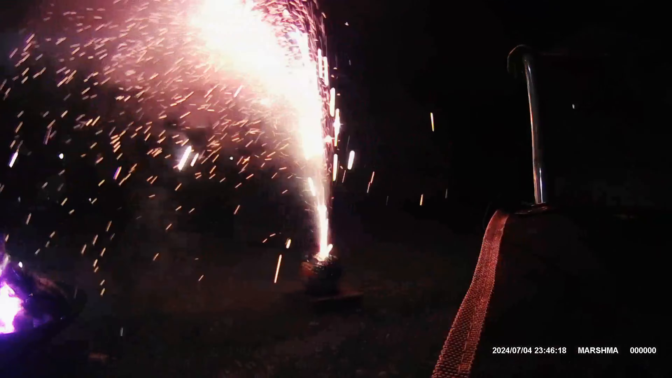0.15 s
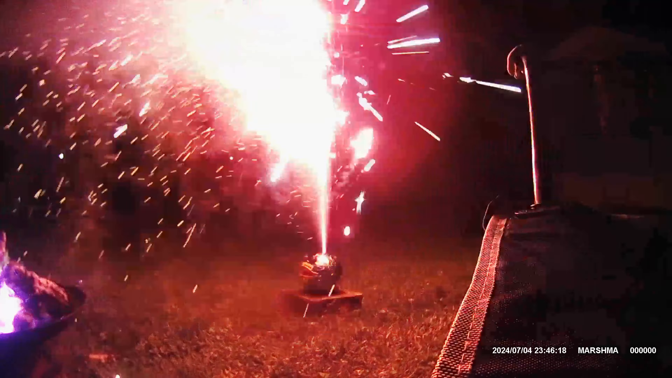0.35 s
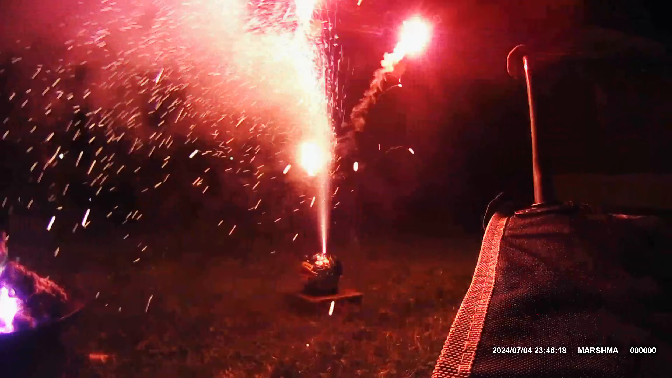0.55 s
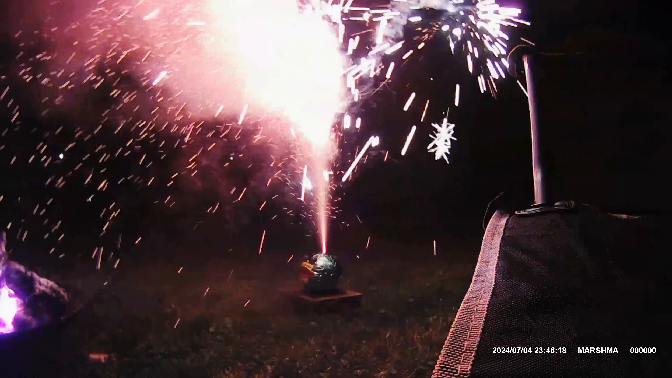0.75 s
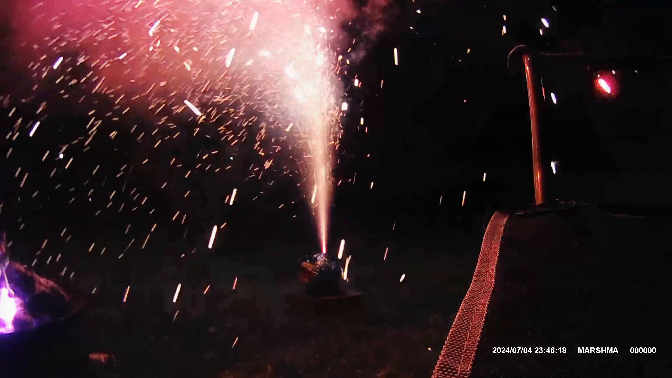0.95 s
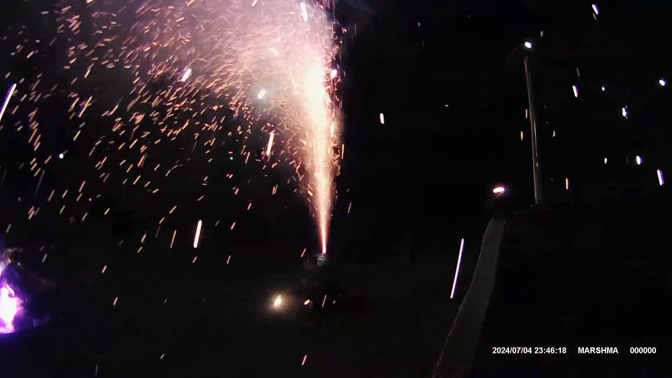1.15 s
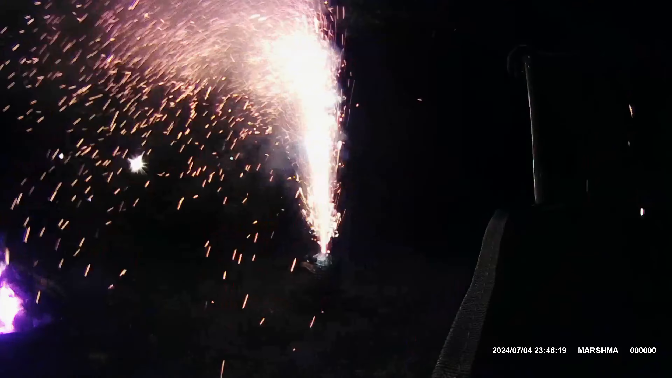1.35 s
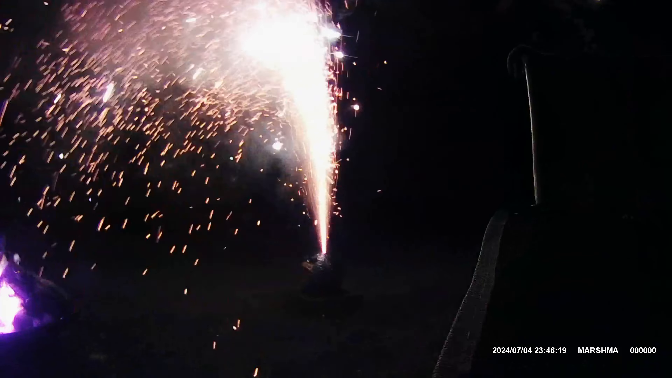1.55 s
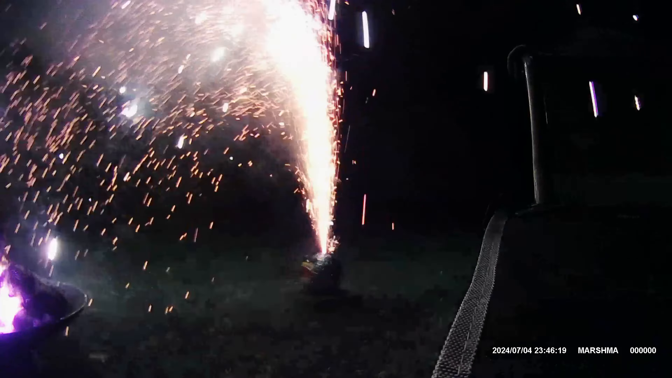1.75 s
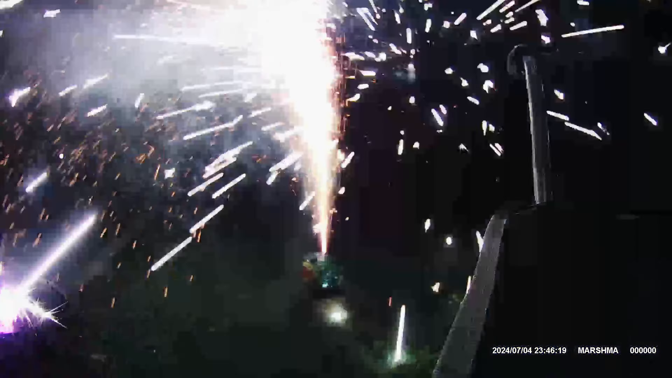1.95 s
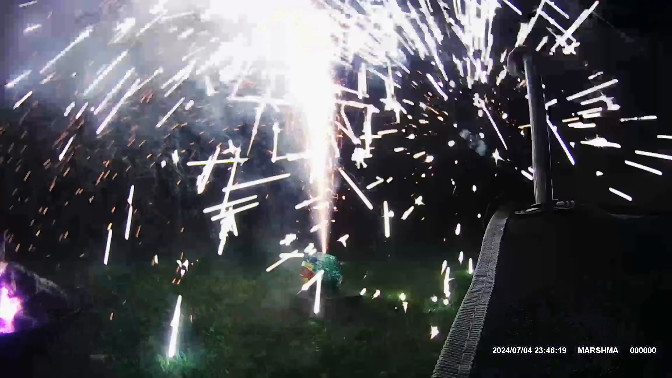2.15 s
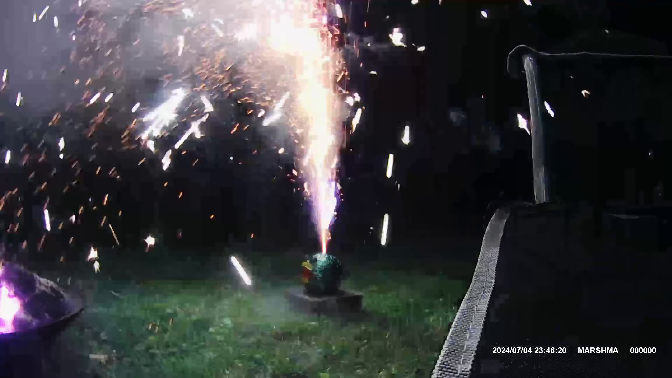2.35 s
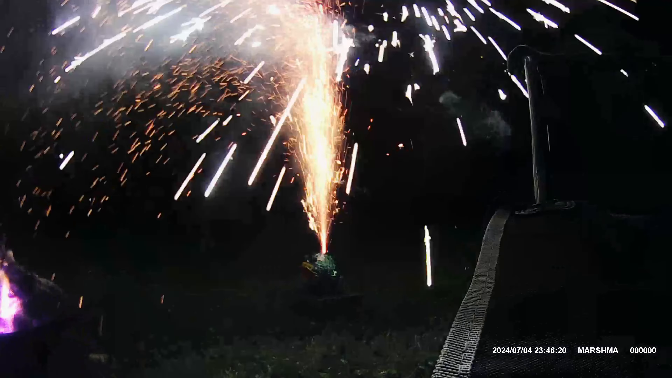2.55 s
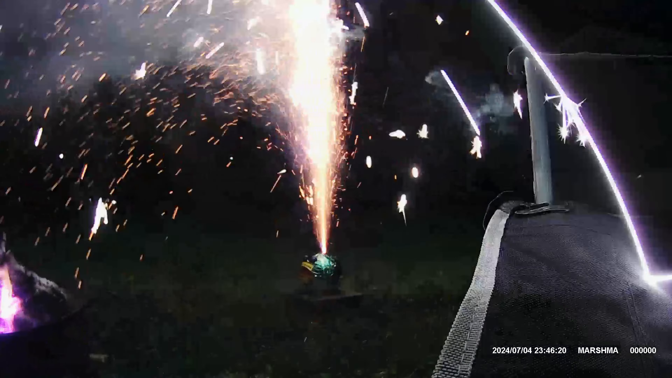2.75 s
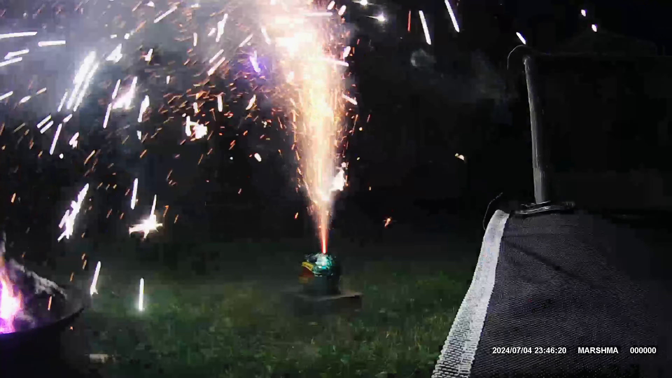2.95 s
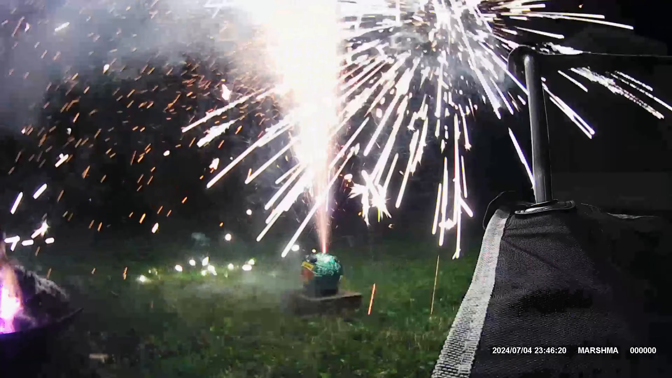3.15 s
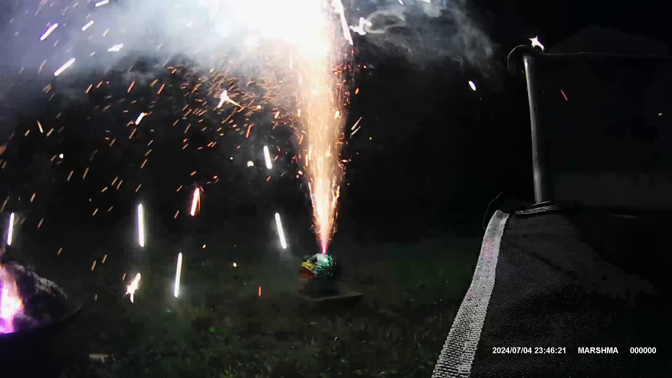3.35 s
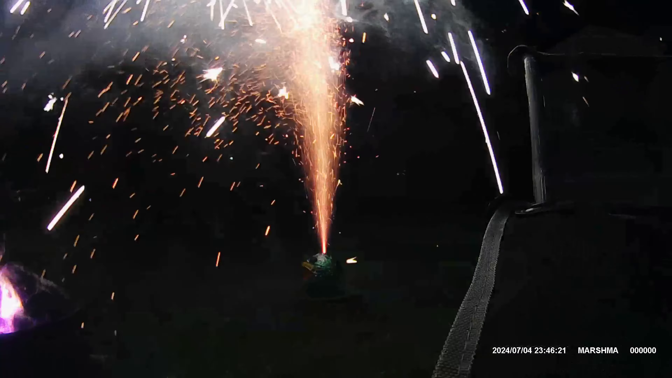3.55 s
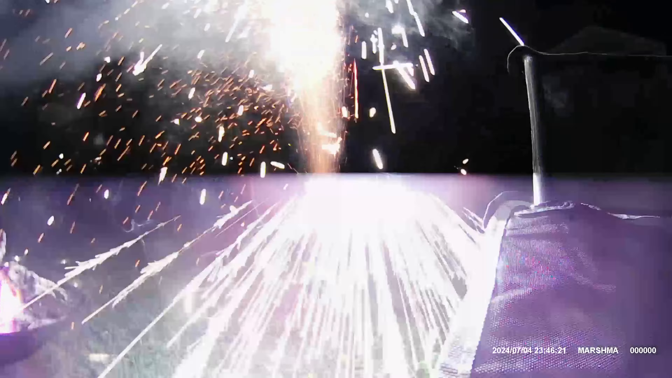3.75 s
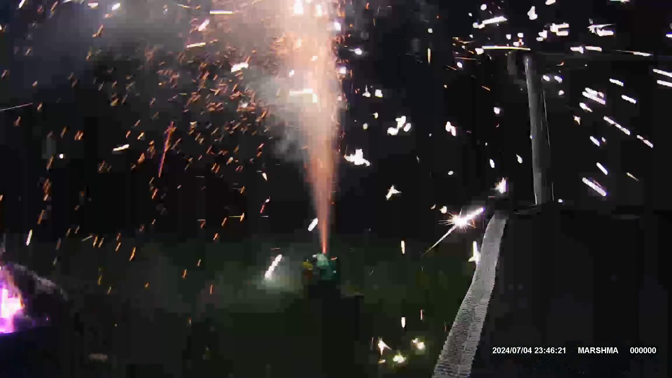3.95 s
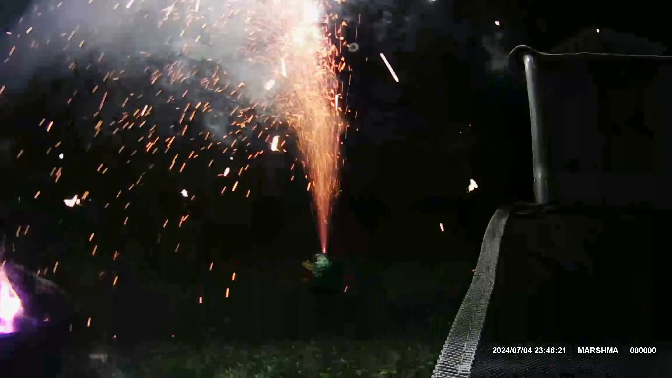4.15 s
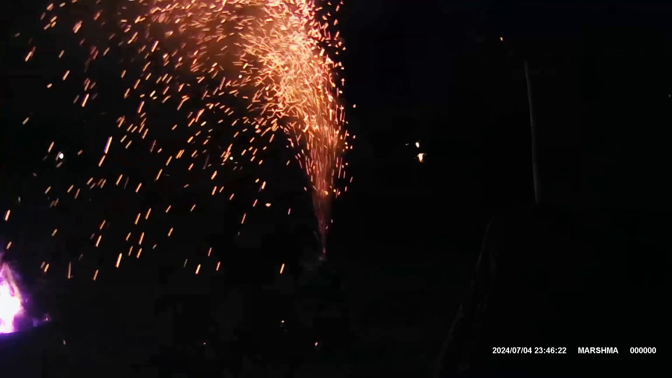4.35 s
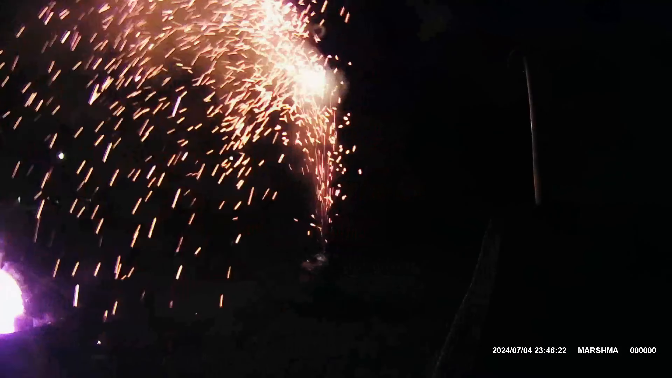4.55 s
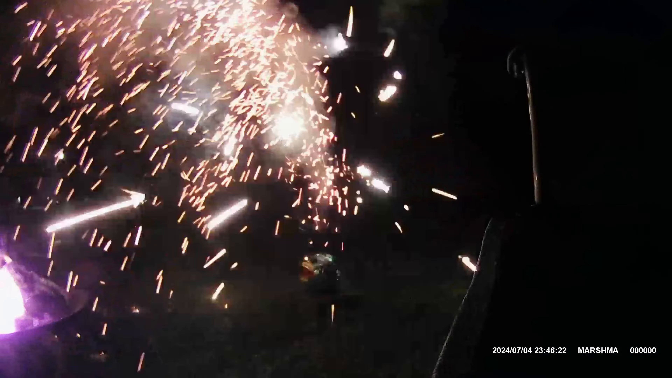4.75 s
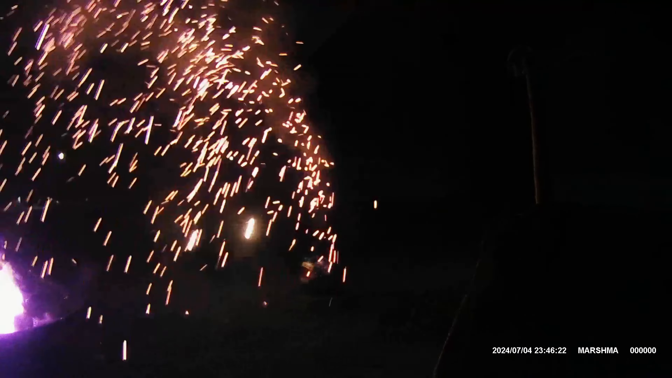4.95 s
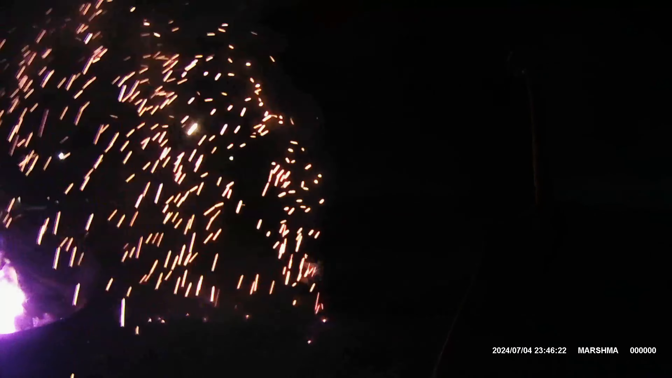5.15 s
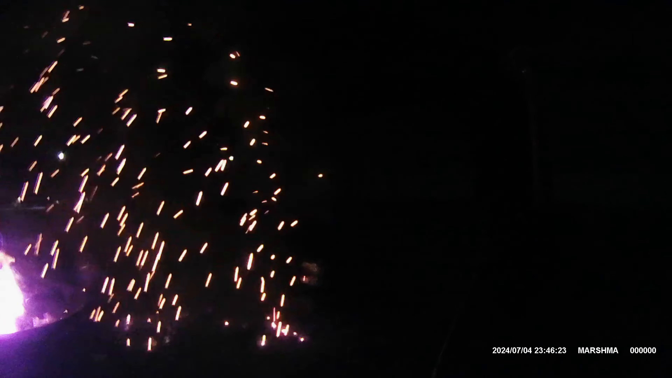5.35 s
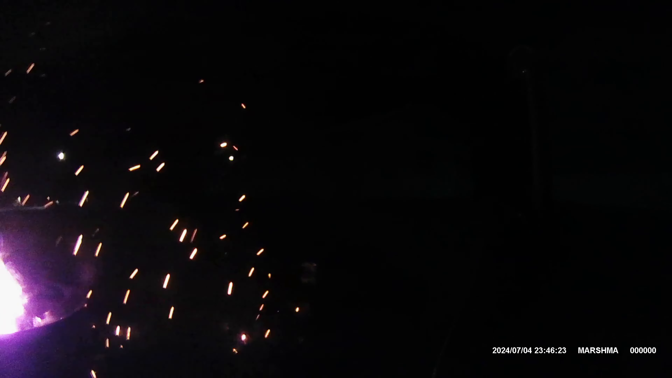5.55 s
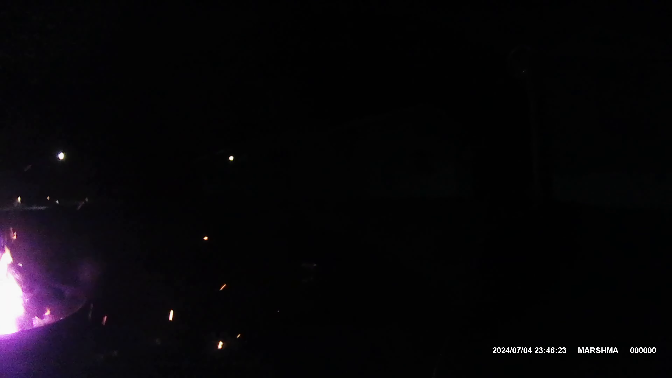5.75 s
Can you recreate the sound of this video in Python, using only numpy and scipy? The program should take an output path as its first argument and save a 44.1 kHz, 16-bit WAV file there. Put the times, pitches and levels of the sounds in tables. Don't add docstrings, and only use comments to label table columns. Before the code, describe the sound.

A ground fountain firework hisses and snaps outdoors, thickens into a violent overloaded crackling barrage, then stops abruptly into faint sizzle and quiet night.

```python
import sys
import numpy as np
from scipy import signal
from scipy.fft import rfft, irfft
from scipy.io import wavfile

SR = 44100
rng = np.random.default_rng(int(sys.argv[2]) if len(sys.argv) > 2 else 0)


def log_audio(samples):
    frames = np.atleast_2d(samples).T
    limited = np.clip(frames, -1, 1)
    pcm = np.round(limited * 32767).astype(np.int16)
    wavfile.write(sys.argv[1], SR, pcm)


def volts(x):
    e = np.asarray(x, float) / 20
    return 10 ** e


N = 260190


def rms_one(x):
    return x / np.sqrt(np.mean(x ** 2) + 1e-20)


def noise():
    return rng.standard_normal(N)


def in_time(rows):
    s, *columns = np.transpose(rows)
    return [np.interp(np.arange(N) / SR, s, c) for c in columns]


def passed(x, order, hz, kind="low"):
    return signal.sosfilt(signal.butter(order, hz, kind, fs=SR, output="sos"), x)


def impulses(times_s, gains):
    clicks = np.zeros(N)
    clicks[np.round(np.asarray(times_s) * SR).astype(int)] = gains
    return clicks


def colour(x, spectrum):
    hz, db = np.transpose(spectrum)
    grid = np.maximum(np.arange(2049) * SR / 4096, 1)
    cepstrum = irfft(np.log(volts(np.interp(np.log(grid), np.log(hz), db))))
    cepstrum[1:2048] *= 2
    cepstrum[2049:] = 0
    response = irfft(np.exp(rfft(cepstrum)))
    response = response / np.sqrt(np.sum(response ** 2))
    return signal.fftconvolve(x, response)[:len(x)]


def drift(rate_hz):
    r = np.exp(-2 * np.pi * rate_hz / SR)
    slow = signal.lfilter([1], [1, -2 * r, r * r], rng.standard_normal(N + SR))[SR:]
    return rms_one(slow)


def damped_cycle(clicks, hz, turns):
    r = volts(-60 * hz / (turns * SR))
    w = 2 * np.pi * hz / SR
    return signal.lfilter([0, np.sin(w)], [1, -2 * r * np.cos(w), r * r], clicks + 1e-18)


# (time [s], level [dB], burst length [ms], low punch [dB])
FIRST_CRACKS = [(0.076, -33, 9.9, -31.5), (0.1113, -27, 1.4, -33.5), (0.1741, -12.5, 0.8, -6.5),
                (0.2066, -3.5, 2.7, -31.5), (0.2196, -16, 0.92, -48), (0.2495, -6, 0.22, -39),
                (0.2567, -21.5, 6.9, -50), (0.2932, -12.5, 3.3, -47), (0.318, -39, 3, -50),
                (0.3704, -6.5, 3.5, -33), (0.3938, -6, 0.34, -55), (0.4496, -21.5, 3.3, -55),
                (0.5769, -12, 0.86, -32), (0.5856, -13.5, 4, -42), (0.7084, -19.5, 2.4, -32),
                (0.7193, -19.5, 0.76, -51), (0.739, -34.5, 1.7, -56), (0.7736, -4, 1.9, -0.5),
                (0.7933, -4.5, 3, -30), (0.9215, -13, 2.9, -44), (0.9855, -16.5, 3, -20),
                (1.0119, -11.5, 1, -53), (1.0666, -15.5, 2.5, -35.5), (1.198, -27.5, 0.85, -58),
                (1.2595, -22.5, 2, -37), (1.2696, -23.5, 2.9, -38), (0.9886, -5.5, 1.4, -37),
                (1.4039, -16, 3.7, -30), (1.4938, -29.5, 0.87, -52), (1.6112, -4, 3.9, 5),
                (1.7113, -3.5, 5, -24.5)]
# (time [s], level [dB], burst length [ms])
VOLLEYS = [(1.7922, 0, 2.8), (1.815, -15.5, 9.1), (1.8244, -1, 10), (1.832, -3.5, 6.5),
           (1.8998, -1.5, 14), (1.9365, -1, 4.5), (1.9726, 1.5, 2.3), (2.0166, -11, 1.2),
           (2.027, -3.5, 1.44), (2.0909, 0, 2.9), (2.1251, 0.5, 1.8), (2.131, -6, 5.7),
           (2.1373, -7.5, 3.5), (2.1447, -2, 2.4), (2.182, -8, 5.5), (2.2005, -24, 0.8),
           (2.2188, -19, 1.2), (2.2416, -2, 5.6), (2.2612, -2, 2.6), (2.3038, -10.5, 3.3),
           (2.31, -6, 12), (2.3192, -5.5, 6.1), (2.3357, -2, 3.2), (2.3892, -9, 13.5), (2.4018, -2, 1.9),
           (2.4234, -17, 1.6), (2.4386, -19, 2.7), (2.4413, -13, 4), (2.4591, -4, 7), (2.5026, -13, 4.3),
           (2.5067, -3.5, 9.6), (2.6052, -12.5, 6.5),
           (2.668, -3, 7.7), (2.706, -1.5, 4.3), (2.719, 1, 2.2), (2.725, 1.5, 2.7), (2.7344, -1.5, 2.4),
              (2.775, -1, 4.8), (2.804, 1, 5.7), (2.8146, -7.5, 4.7), (2.822, -2.5, 6.6), (2.8407, -2, 2),
              (2.8656, -20, 4.2), (2.8714, -6.5, 6), (2.887, -1.5, 8.0), (2.898, -1, 5.1),
              (2.9202, -6.5, 8.2), (2.967, -21, 0.72), (2.9785, -2, 0.55), (2.991, -12, 2),
              (2.997, -6, 9.3), (3.012, 4.5, 3.1), (3.021, -0.5, 1.8), (3.079, -0.5, 5.8), (3.0888, 0, 3.4),
              (3.1216, -16.5, 0.9), (3.1267, 0, 7.6), (3.153, -2.5, 4.8), (3.1661, -2, 12),
              (3.188, -12, 2.5), (3.196, -12, 6.6), (3.214, -11.5, 1.1),
           (3.247, -8, 12), (3.252, 0, 4.7), (3.2756, -5, 8.3), (3.306, 0, 3.1), (3.333, 0.5, 2.8),
                (3.354, -13.5, 2.2), (3.359, 0, 3.7), (3.369, -0.5, 5), (3.3865, 0, 4.6), (3.406, -9, 2.6),
                (3.4095, -0.5, 2), (3.433, -2, 21), (3.443, -9, 10), (3.454, -1.5, 3.5), (3.4683, -12, 1.5),
                (3.479, -15.5, 1.3), (3.49, -2, 13.5), (3.5, 2.5, 3.4), (3.514, -2, 10.3), (3.546, -6, 8.4),
                (3.61, -5, 8.7), (3.623, -15, 0.92), (3.625, -11, 1.6), (3.6556, -14.5, 0.74),
                (3.6598, -3, 3.3), (3.6692, 2, 2.7), (3.679, -7.5, 4.5),
           (3.7205, -13.5, 1.1), (3.7257, -6.5, 4.4), (3.736, 0.5, 6.5), (3.7626, -1.5, 4),
               (3.7838, -3, 3.3), (3.7921, -5, 1.4), (3.813, -12.5, 5.2), (3.823, -2, 6.4),
               (3.8476, -13.5, 1.3), (3.8667, -1.5, 15.5), (3.879, -9, 2.5), (3.903, 0.5, 4.2),
               (3.9333, 4.5, 3), (3.951, -3, 2.6), (3.9683, -4, 4.2), (3.98, -3.5, 7.6), (3.994, -5.5, 8.6),
               (4.05, -3, 5.2), (4.0664, -5.5, 7.9), (4.0727, -7.5, 3.3), (4.0865, -7, 5.8),
               (4.1024, -8.5, 8.3), (4.1654, 1.5, 6.4), (4.2084, -5, 6), (4.2112, -1, 4.9),
               (4.7113, -12, 1.9)]


def bursting_stars():
    volleys = VOLLEYS
    return FIRST_CRACKS + [(s, db, ms, -13.5 + 2.5 * db) for s, db, ms in volleys]


# (time [s], level [dB])
BOOMS = [(2.027, -10.5), (2.1323, -9.5), (2.31, -5.5), (2.4017, -5.5), (2.668, -14), (2.7046, -10.5),
         (3.1538, -5.5), (3.2479, -12.5), (3.443, -9), (3.6113, -7.5), (3.681, -12), (3.7273, -9),
         (3.933, 0), (4.053, -10.5), (4.067, 4.5), (4.0872, -10.5), (4.1039, -14.5), (4.2083, -20),
         (4.7125, -57)]
# (frequency [Hz], density [dB per Hz])
CRACK_COLOUR = [(35, -19), (60, -11.5), (408, -0.5), (898, -1.5), (983, 0), (1230, -1), (2160, 1),
                (3100, -1.5), (7150, 1.5), (11500, -3), (13100, -16.5)]


def cracks(spread_db, fade_ms, fade_share, droop_db, linger_ms, linger_db, linger_lags, overload_db, knee_db):
    envelope, punches, fronts = np.zeros((3, N))
    after_ms = np.arange(SR // 12) * 1000 / SR
    for s, db, length_ms, punch_db in bursting_stars():
        at = round(s * SR)
        drive_db = db + overload_db * np.clip((db - knee_db) / -knee_db, 0, 1)
        late = np.maximum(after_ms - length_ms, 0)
        fade = fade_ms + fade_share * min(length_ms, 5)
        shape = volts(droop_db * np.minimum(after_ms / length_ms, 1)) * np.exp(-late / fade)
        shape = shape + volts(linger_db - linger_lags * (drive_db - db)) * np.exp(-late / linger_ms)
        span = slice(at, at + len(shape))
        envelope[span] = np.hypot(envelope[span], volts(drive_db) * shape[:N - at])
        punches[at] = volts(punch_db + 12.5)
        front_db = drive_db + 2.5 + 6 * np.clip(db / knee_db, 0, 1)
        fronts[at] = volts(min(front_db, -1))
    for s, punch_db in BOOMS:
        punches[round(s * SR)] += volts(punch_db + 22)
    sizes = volts(spread_db * np.minimum(rng.exponential(1, N), 5)) * rng.choice([-1, 1], N)
    swarm = envelope * rms_one(sizes) * volts(1.2 * drift(450))
    bright = lone_treble(colour(swarm, CRACK_COLOUR) + shock(fronts))
    return bass_tint(tint(bright) + punch(punches))


def shock(clicks):
    clicks = clicks + volts(-22.5) * np.roll(clicks, round(0.0009 * SR))
    return damped_cycle(clicks, hz=8600, turns=4.5) + volts(-4) * damped_cycle(clicks, hz=4900, turns=3.5)


def punch(clicks):
    clicks = clicks + volts(-24.0) * np.roll(clicks, round(.0024 * SR))
    edge = volts(-4) * damped_cycle(clicks, hz=1650, turns=4.0)
    body = damped_cycle(clicks, hz=670.0, turns=2.6) + edge
    return passed(body, 1, 110, "high")


# (time [s], body [dB], treble [dB])
TINTS = [(.174, 8, -9), (.207, -0.5, -3.5), (.293, 1, 0), (.393, -12, 6), (.793, -3.5, 0), (.921, 0.5, 2),
         (.985, 4.5, 0), (1.403, 0, 7), (1.611, 8, -11), (1.711, 2, -1.5), (2.182, -3, 2.5),
         (2.39, -0.5, 2.5), (2.872, 11.5, 7.5), (3.079, 2.5, 2.5), (3.36, 2, -1.5), (3.432, 5, -1),
         (3.546, 4.5, 2.5), (3.61, 3.5, -1.5), (3.66, 0, 4.5), (3.726, -3, -2.5), (3.823, 0, -3.5),
         (3.951, 6.5, -3), (.578, 1.5, -11), (.709, -5.5, 7.5), (.774, 2, -4), (1.012, 1.5, 3),
         (1.067, -0.5, -0.5), (4.711, 2, 5.5)]
TINT_LEAD_S, TINT_S = .002, 0.011


def tint(x):
    body, treble = np.zeros((2, N))
    for s, body_db, treble_db in TINTS:
        span = slice(round((s - TINT_LEAD_S) * SR), round((s + TINT_S) * SR))
        body[span] = volts(body_db) - 1
        treble[span] = volts(treble_db) - 1
    return x + body * passed(x, 1, (400, 1600), "band") + treble * passed(x, 1, 7000, "high")


# (time [s], bass [dB])
BASS_TINTS = [(.207, -7.5), (.25, -8), (.293, -1), (.599, 6), (.709, 5.5), (1.403, 5.5), (1.711, -12),
              (2.182, 3.5), (2.261, -5.5), (2.669, -3.5), (2.84, -6), (2.888, 2), (3.546, 0), (3.879, -8),
              (3.904, -9.5), (3.952, 3), (4.05, -3.5), (4.103, -8), (4.255, 6), (4.711, -2.5)]


def bass_tint(x):
    share = np.zeros(N)
    for s, bass_db in BASS_TINTS:
        share[round((s - TINT_LEAD_S) * SR):round((s + TINT_S) * SR)] = volts(bass_db) - 1
    return x + passed(share * x, 1, 500)


# (time [s], share of the full rate [1])
STRAY_ACTIVITY = [(0, .03), (1.7, .03), (2.0, .8), (3.4, 1.2), (4.2, .9), (4.4, .02), (5.1, 0.012),
                  (5.9, 0)]


def sparks(per_s, level_db, spread_db):
    busy = np.maximum(in_time(STRAY_ACTIVITY)[0], 0)
    born = rng.random(N) < per_s * busy * volts(5.0 * drift(40)) / SR
    sizes = volts(level_db + spread_db * np.minimum(rng.exponential(1, N), 2))
    return shock(born * sizes * busy ** 1.5)


def lone_treble(x):
    clear = np.clip(1 - in_time(STRAY_ACTIVITY)[0], 0, 1)
    return x + volts(-4) * clear * passed(x, 2, 6900, "high")


# (time [s], peak [dB])
NEAR_TICKS = [(0.163, -34), (0.3292, -27), (0.4234, -18), (0.4948, -14.5), (0.6736, -8.5), (0.783, -12.5),
              (0.7904, -10.5), (0.831, -9.5), (0.9844, -1), (1.382, -16.5), (1.401, -5), (1.4521, -9),
              (1.4941, -26), (1.7016, -21), (1.755, -8), (2.0826, -9), (2.2002, -7.5), (2.2265, -14.5),
              (2.2379, -8.5), (2.381, -15), (2.7699, -10.5), (2.9497, -9.5), (3.0555, -10), (3.2996, -1.5),
              (3.54, -1.5), (3.601, -7), (3.851, -7.5), (3.919, -3), (3.9774, 2), (4.0384, -9),
              (4.2551, -9), (4.3128, 1),
              (0.6621, -15), (0.8214, -8), (1.9952, -7), (2.3631, -7.5), (2.4885, -7.5), (2.6216, -7),
             (2.765, -10), (2.8655, -8), (2.957, -17), (3.122, -7), (3.2157, -8), (3.235, -5), (3.4695, -7),
             (3.477, -7.5), (3.5645, -8), (3.5925, -11), (4.0128, -5.5), (0.258, -10), (0.449, -12.5),
             (.484, -18), (.628, -19.5), (1.347, -21), (1.9374, 1.5), (2.0472, -16), (2.1789, -9.5),
             (2.4267, -3), (2.8495, -3.5), (2.8844, -3), (2.945, -8.5), (3.3235, -4.5), (3.719, -1),
             (3.7788, -2), (3.8046, -1), (4.1224, -10), (4.1978, -3.5)]
# (time [s], peak [dB])
FAR_TICKS = [(0.1748, 3.5), (0.599, -12.5), (0.905, -14), (1.658, -8), (2.0101, -10.5), (2.1727, -3),
             (2.2361, -1), (2.285, -6), (2.3504, -3), (2.568, 0), (2.617, -4), (2.6434, -9.5), (2.7651, -1),
             (3.0406, -2.5), (3.0559, -13.5), (3.1057, 4), (3.2386, -0.5), (3.485, 3.5), (3.5986, -13.5),
             (3.601, -9.5), (3.7144, 1), (4.024, 2.5), (4.15, -19.5), (4.161, -8.5), (4.247, -11),
             (4.2551, -14.5), (4.278, 0), (4.2805, 0.5), (4.2907, -30), (4.3199, 7.5), (4.416, -26)]
# (frequency [Hz], density [dB per Hz])
ECHO_COLOUR = [(35, -57), (60, -37), (290, -3.5), (900, -11), (1500, -3), (2400, -6), (4000, -2),
               (8000, -2.5), (11500, -20.5), (13000, -33.5)]


def ticks(scatter_db, scatter_ms):
    near = [(s, db, -16.5) for s, db in NEAR_TICKS]
    far = [(s, db, 1) for s, db in FAR_TICKS]
    s, db, ring_db = np.transpose(near + far)
    clicks = impulses(s, volts(db + 1.5 - np.maximum(ring_db + 5.5, 0) * 0.95))
    rings = impulses(s, volts(db + ring_db - 9.0))
    die = np.exp(-1000 / (scatter_ms * SR))
    scatter = volts(scatter_db) * signal.lfilter([1], [1, -die], clicks + 1e-18) * noise()
    thin = lone_treble(shock(clicks)) + damped_cycle(rings, hz=2380, turns=12.0)
    return passed(thin + colour(scatter, ECHO_COLOUR), 4, 1600, "high")


# (time [s], level [dB])
PUSHES = [
    (.294, -38),
    (.395, -37),
    (.713, -31),
    (1.404, -25),
    (1.612, -24.5),
    (2.18, -21),
    (2.47, -22),
    (2.893, -16),
    (4.7108, -24.5),
]


def pushes():
    s, db = np.transpose(PUSHES)
    return damped_cycle(impulses(s, volts(db + 3.5)), hz=130, turns=1.3)


# (time [s], level [dB])
JET = [(0, -34), (.2, -33.5), (.6, -31.5), (1, -33), (1.4, -32), (1.8, -30.5), (2.28, -25), (2.54, -29.5),
       (2.7, -22), (3.02, -31.5), (3.4, -23), (3.7, -30), (4.02, -26.5), (4.14, -40.5), (4.3, -33),
       (4.5, -63), (4.9, -89), (5.9, -97)]
# (frequency [Hz], density [dB per Hz])
HISS = [(410, -36), (700, -10.5), (939, -32), (1070, -16.5), (1370, -10.5), (1880, 4), (3780, -2),
        (4950, 1.5), (5950, 1.5), (6480, -1.5), (7300, 1.5), (10400, -2), (12500, -10.5), (13100, -13.5)]
# (low edge [Hz], high edge [Hz])
PATCH_BANDS_HZ = [(1500, 3000), (3000, 5200), (5200, 8200), (8200, 12500)]


def jet():
    hiss_db, = in_time(JET)
    roar_db = -45.5 + (hiss_db + 33.5)
    hiss = colour(noise(), HISS) * volts(hiss_db + 1.2 * drift(25))
    for edges in PATCH_BANDS_HZ:
        hiss = hiss + passed(hiss, 1, edges, "band") * (volts(1.5 * drift(22)) - 1)
    roar = rms_one(passed(noise(), 2, [130, 650], "band"))
    return hiss + roar * volts(roar_db + 1.2 * drift(3.2))


# (time [s], level [dB])
EMBERS = [(0, -59), (4.2, -63), (4.6, -74.5), (4.9, -58.5), (5.2, -60), (5.5, -70), (5.9, -90)]


def embers():
    sizzle = rms_one(passed(noise(), 1, 4500, "high"))
    return volts(in_time(EMBERS)[0] + .8 * drift(30)) * sizzle


# (time [s], peak [dB])
LAST_SNAPS = [
    (4.6647, -37),
    (4.7762, -43),
    (4.7918, -46),
    (4.8251, -36),
    (4.8703, -34),
    (4.9707, -49),
    (5.0012, -44),
    (5.0791, -48),
]


def last_snaps():
    s, db = np.transpose(LAST_SNAPS)
    clicks = impulses(s, volts(db))
    die = np.exp(-1000 / (.9 * SR))
    scatter = volts(-1) * signal.lfilter([1], [1, -die], clicks + 1e-18) * noise()
    start_s, length_s, start_hz, sag_hz_per_s = 4.872, .06, 3100, 11000
    age = np.clip(np.arange(N) / SR - start_s, 0, length_s)
    whir = np.sin(np.pi * age / length_s) * np.sin(2 * np.pi * (start_hz - sag_hz_per_s * age / 2) * age)
    return damped_cycle(clicks, hz=8400, turns=4.2) + colour(scatter, CRACK_COLOUR) + volts(-62) * whir


def garden(x, t60_s, gap_s, spectrum):
    build, die = np.exp(-1 / (gap_s * SR)), 10 ** (-6 / (t60_s * SR))
    arriving = signal.lfilter([1 - build], [1, -build], x ** 2)
    energy = signal.lfilter([1 - die], [1, -die], arriving)
    return np.sqrt(energy) * colour(noise(), spectrum) * volts(1.0 * drift(40))


# (frequency [Hz], density [dB per Hz])
TAIL_COLOUR = [(35, -59.5), (60, -36.5), (290, -2), (600, -11), (1000, -9), (1500, -7), (2400, 0),
               (4000, -5), (8000, -12), (13000, -33.5)]
# (frequency [Hz], density [dB per Hz])
TAIL_TREBLE = [(1000, -31), (3000, -10), (6000, -4.5), (10000, 0), (13000, -18.5)]


def echoes(stars):
    far = volts(-30.5) * garden(stars, t60_s=1.065, gap_s=0.0068, spectrum=TAIL_COLOUR)
    bright = volts(-29.5) * garden(stars, t60_s=0.68, gap_s=0.0075, spectrum=TAIL_TREBLE)
    near = volts(-29.0) * garden(stars, t60_s=0.073, gap_s=.004, spectrum=CRACK_COLOUR)
    return far + bright + near


# (time [s], level [dB])
THUDS = [
    (.08, -32),
    (.114, -27),
    (.277, -27),
    (.501, -32),
    (.663, -25),
    (.693, -31),
    (.865, -33),
]
# (time [s], level [dB])
LATE_THUDS = [
    (5.358, -51),
    (5.368, -50),
    (5.535, -57),
    (5.588, -53),
    (5.712, -50),
]


def far_thuds():
    s, peak_db = np.transpose(THUDS + LATE_THUDS)
    clicks = impulses(s, volts(peak_db))
    deep = volts(0.5) * (np.arange(N) > EMBERS[2][0] * SR) * clicks
    return damped_cycle(clicks, hz=245, turns=7.9) + damped_cycle(deep, hz=119.6, turns=4.9)


# (frequency [Hz], level [dB], first pulse [s], start of swelling [s])
BUZZ = [
    (4985, -77.5, .498, 4.9),
    (12230, -77, .514, 5.25),
]


def insects():
    t = np.arange(N) / SR
    buzz = np.zeros(N)
    for hz, db, first_s, swell_s in BUZZ:
        pulses = np.clip(.3 + np.cos(2 * np.pi * 30.0 * (t - first_s)), 0, 1)
        swelling = np.clip((t - swell_s) * 3, 0, 1)
        buzz += volts(db + 64) * np.sin(2 * np.pi * hz * t) * pulses * swelling
    return buzz * volts(1.6 * drift(8)) * np.clip((5.93 - t) * 20, 0, 1)


# (frequency [Hz], density [dB per Hz])
NIGHT = [(18, -44.5), (30, -24), (58, -10.5), (156, -0.5), (420, -13.5), (760, -18), (2000, -19.5),
         (5000, -29), (9000, -26.5), (12700, -34.5), (13200, -47.5)]
# (time [s], level [dB])
NIGHT_LEVEL = [(0, -68.5), (5.3, -61.5), (5.75, -62), (5.9, -68)]


def night():
    steady = colour(noise(), NIGHT)
    gusts = passed(steady, 2, 450) * (volts(2.2 * drift(14)) - 1)
    return volts(in_time(NIGHT_LEVEL)[0]) * (steady + gusts + insects())


def scene():
    stars = cracks(spread_db=2.5, fade_ms=0.82, fade_share=0.12, droop_db=-7.0, linger_ms=7.6,
                   linger_db=-19.5, linger_lags=0.38, overload_db=15.0, knee_db=-14.0)
    small = ticks(scatter_db=-8.5, scatter_ms=0.64) + sparks(per_s=310.0, level_db=-24.0, spread_db=7.5)
    fountain = jet() + embers() + last_snaps() + pushes()
    return (stars + small + fountain + echoes(stars) + far_thuds() + night())[None]


# (time [s], deaf time [ms], rebound height [0-1], overshoot [0-1])
SHOCKS = [(1.805, 9.8, 0.46, 0.5), (1.8307, 0.92, 0.1, .1), (1.936, 4.9, 0.37, 0.55),
          (2.021, 1.8, 0.5, 0.55), (2.1251, 2.5, 0.3, .05), (2.1281, 1.2, .15, 0.1),
          (2.1401, 6.7, 0.6, 0.3), (2.304, 1.2, 0.35, 0.3), (2.397, 0.6, 0.3, 0.5),
          (2.5992, 4.5, 0.55, 0.46), (2.776, 1.1, 0, 0), (2.8039, 1.2, 0.07, 0.3), (2.9813, 8.7, 0.7, 0.3),
          (2.9972, 3.4, 0.3, 0.2), (3.1465, 1, 0.48, 0.2), (3.1887, 3, 0.68, 0.4), (3.3865, 1.3, 0, 0),
          (3.407, 3.5, 0.63, .1), (3.5145, 1.6, 0.1, 0.3), (3.674, 0.93, 0.27, 0.6), (3.717, 1.3, 0.4, .15),
          (3.7851, 3.3, 0.4, 0.2), (3.8049, 8.4, 0.4, 0.3), (4.2024, 1.2, 0.5, .1)]
# (time after the shock [ms], deflection [1])
PINNED = [(0, 0), (0.061, .6), (.14, -.72), (.75, -0.76), (1.1, 0)]
# (time after the shock [ms], deflection [1])
REBOUND = [(1.1, 0), (1.5, .75), (2, 1.05), (2.6, .9), (3.8, .28), (4.9, .06), (6.5, 0)]
# (time after the shock [ms], deflection [1])
OVERSHOOT = [(1.1, 0), (1.62, .7), (1.95, -.6), (2.4, 0)]
# (time after deafness [ms], deflection [1])
SETTLE = [(0, 0), (1.2, 1), (2.6, -.45), (9, -.2), (18, 0)]


def diaphragm(x, deaf_db):
    hearing, swing = np.ones(N), np.zeros(N)
    after_ms = np.arange(SR // 50) * 1000 / SR
    shapes = (PINNED, REBOUND, OVERSHOOT, SETTLE)
    pinned, rebound, knock, settle = (np.interp(after_ms, *np.transpose(shape)) for shape in shapes)
    for s, deaf_ms, height, overshoot in SHOCKS:
        at = round(s * SR)
        rest = at + round(max(deaf_ms, 6.5) * SR / 1000)
        swing[at:at + len(after_ms)] += pinned + height * rebound + overshoot * knock
        swing[rest:rest + len(after_ms)] += 0.2 * 2 * height * settle
        hearing[at:at + round(deaf_ms * SR / 1000)] = volts(deaf_db)
    return x * hearing + swing


def roll_off(x):
    return signal.sosfilt(signal.butter(12, 13290, fs=SR, output="sos"), x)


def record(dry):
    cutoff_hz = 12830
    x = dry / (1 + np.abs(dry / .585) ** 4) ** (1 / 4)
    x = diaphragm(x, deaf_db=-9.0)
    x = passed(x, 1, 30, "high")
    x = signal.sosfilt(signal.ellip(8, .3, 20, cutoff_hz, fs=SR, output="sos"), x)
    x = signal.sosfilt(signal.cheby2(18, 50, cutoff_hz + 620, fs=SR, output="sos"), x)
    finished = np.clip(volts(-1.2) * x, -1, 1)
    return roll_off(finished)


dry = scene()
out = record(dry)
log_audio(out)
```